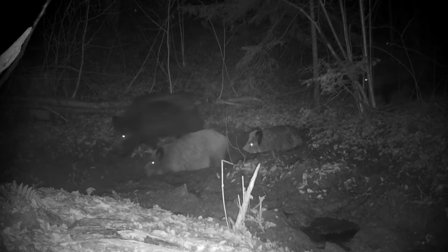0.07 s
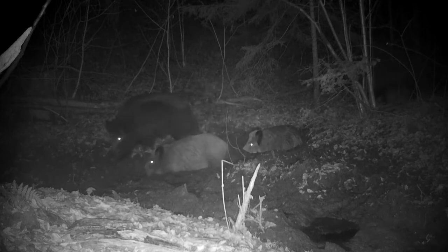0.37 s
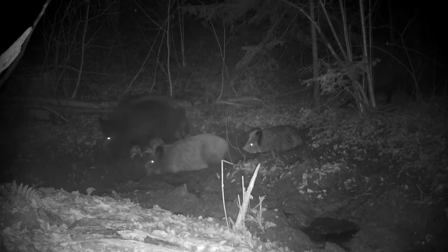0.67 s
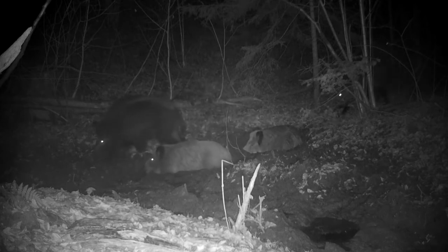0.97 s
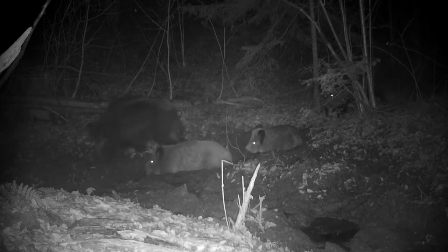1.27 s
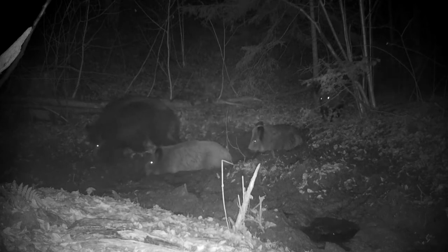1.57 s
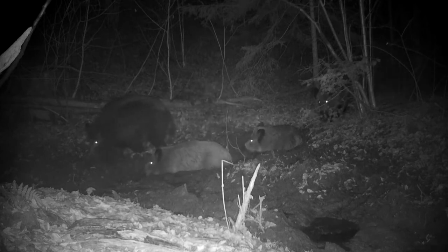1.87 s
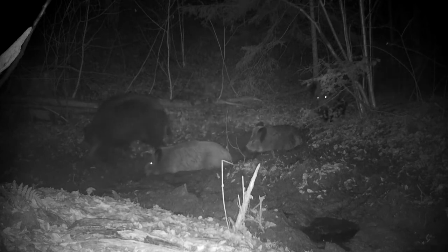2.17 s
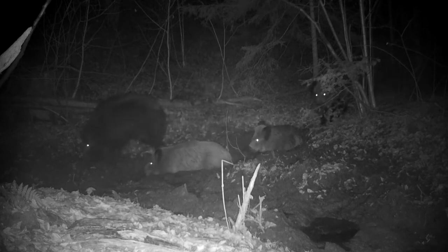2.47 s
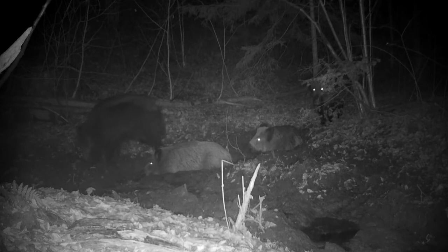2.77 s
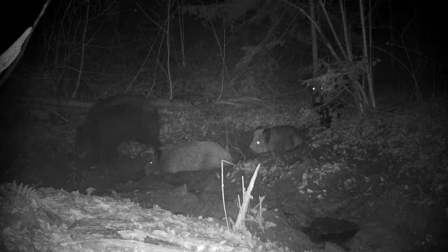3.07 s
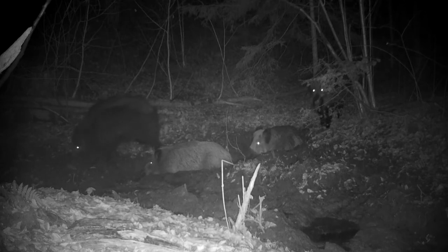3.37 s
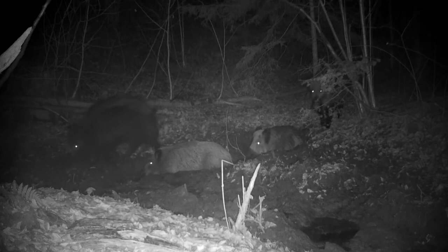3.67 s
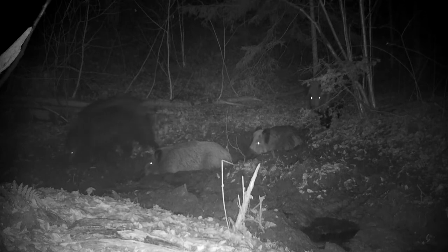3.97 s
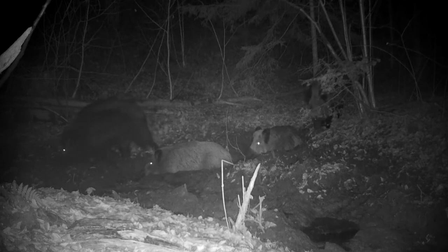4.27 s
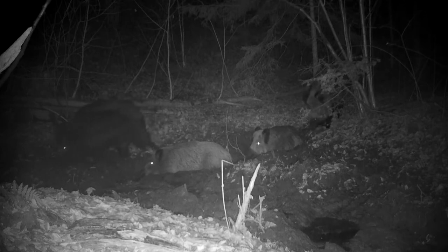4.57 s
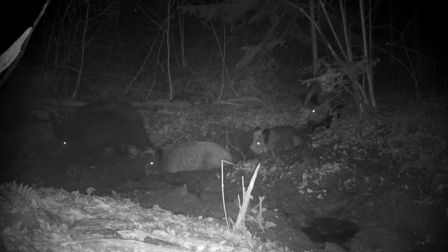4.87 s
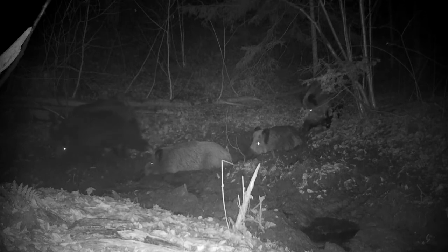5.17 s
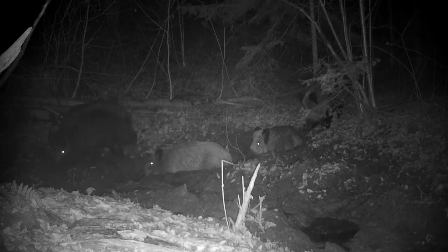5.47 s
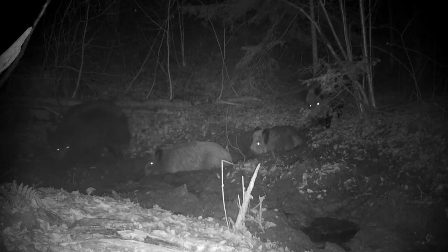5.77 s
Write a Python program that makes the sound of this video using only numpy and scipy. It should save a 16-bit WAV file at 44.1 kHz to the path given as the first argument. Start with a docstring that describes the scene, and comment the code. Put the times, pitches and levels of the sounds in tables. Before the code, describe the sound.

Wild boars root in mud some metres off, with small wet pops, squelches, ticking twigs and rustling leaves over a steady hiss.

```python
"""Mud squelches and pops, with two soft hoof thuds: wild boars root in a forest hollow at night.
Snouts and hooves open air pockets in the mud, which pop singly or squelch in bursts.
Twigs tick, wet leaves rustle, dead leaves crunch and, near the end, a branch snaps.
The herd is some metres off; the trees answer faintly, over a steady hiss."""
import sys
import numpy as np
from scipy import signal
from scipy.fft import rfft, irfft, next_fast_len
from scipy.io import wavfile
from scipy.ndimage import map_coordinates

SR = 44100
rng = np.random.default_rng(int(sys.argv[2]) if len(sys.argv) > 2 else 0)


def bounce(signal):
    """Save signal as a 16-bit WAV file at the path given by the first command-line argument."""
    frames = np.transpose(np.atleast_2d(signal))
    limited = np.clip(frames, -1, 1)
    pcm = np.round(limited * 32767).astype(np.int16)
    wavfile.write(sys.argv[1], SR, pcm)


N = 261072

# mud suction: (time [s], length [s], level [dB], low cavity [Hz], high cavity re low [dB])
SQUELCH_EVENTS = [(0.042, 0.027, -62, 580, 20), (0.329, 0.02, -55.5, 760, 13),
                  (0.4, 0.026, -59.5, 730, -17), (0.502, 0.024, -55, 480, 9),
                  (1.515, 0.094, -49.5, 800, -25), (1.558, 0.063, -54.5, 580, -12),
                  (1.846, 0.025, -68, 830, 0), (2.332, 0.017, -62.5, 790, 14),
                  (2.357, 0.021, -61.5, 607, -3), (2.733, 0.013, -66.5, 530, -7),
                  (2.807, 0.037, -58, 655, 11), (2.853, 0.016, -67.5, 605, -18),
                  (2.989, 0.013, -64.5, 600, 13), (3.055, 0.022, -55, 630, -3), (3.079, 0.017, -63, 520, 7),
                  (3.691, 0.075, -59, 520, -17), (4.061, 0.042, -57.5, 670, 3),
                  (4.512, 0.049, -58.5, 630, -6), (5.611, 0.094, -57.5, 695, 6)]
# wet splatter: (frequency [Hz], relative level [dB])
SPLATTER_SPECTRUM = [(50, -40), (150, -27), (300, -11.5), (500, 3.5), (1300, -3.5), (2400, -2),
                     (3500, -8.5), (5500, -14.5), (8000, -26), (15000, -66)]
# bright edge of a crack, with a faint fizz above 12 kHz: (frequency [Hz], relative level [dB])
CRACK_SPECTRUM = [(40, -55), (200, -25), (1500, 8), (4000, -8), (6000, 0.5), (8000, -5), (12000, -23),
                  (15300, -22)]
SPLINTER_RISE_S = 0.0015


def pops(attack_s=0.0015, glide=0.035, t60_1khz_s=0.029, splatter_t60_ratio=0.37, dull_hz=6500):
    """A pocket tears open: its air rings at two pitches, rising as it opens, and mud splatters."""
    # air pockets: (time [s], level [dB], low cavity [Hz], high cavity [Hz], high re low [dB],
    # splatter re stronger cavity [dB])
    pockets = [(0.3125, -24.5, 458, 1240, 1, 2), (0.3339, -19, 1410, 2300, 1, 6.5),
               (0.3477, -20, 1245, 2360, 1, -5.5), (0.3662, -27, 1240, 2280, -2, 1),
               (0.3975, -27, 687, 1220, -3, 2), (0.403, -27, 844, 2410, 12, -8),
               (0.4165, -28.5, 890, 2520, -3, -7), (0.437, -29, 656, 1450, -9, -9),
               (0.445, -32, 900, 2350, 1, -9), (0.4835, -25.5, 597, 803, 3, 6),
               (0.4951, -19, 812, 1247, -0.5, -2), (0.4965, -29, 507, 1446, 17, -9),
               (0.51, -25.5, 740, 1900, 2, -9), (1.1125, -33, 1350, 1710, 7, -2),
               (1.23, -37, 1920, 3030, -3, -2), (1.317, -33.5, 790, 1350, 8, 1),
               (1.518, -29, 598, 1390, -2, -13), (1.527, -22.5, 770, 1350, 1.5, -11),
               (1.5405, -34, 616, 1400, -6, -10), (1.578, -32, 650, 1290, 7, -6),
               (1.589, -36, 603, 1480, 10, -9), (1.816, -30.5, 765, 1980, 5, 10),
               (1.859, -37, 830, 1870, -3, -13), (2.157, -26.5, 780, 1350, -3.5, -1),
               (2.191, -29, 845, 1450, 1, -10), (2.228, -29.5, 1760, 2090, -16, -14),
               (2.329, -32, 810, 1496, 9, 1), (2.4935, -33.5, 786, 1530, -31, -17),
               (2.625, -30.5, 1880, 2500, -9, -2), (2.786, -33, 580, 2480, -3, -12),
               (2.823, -35.5, 900, 1590, 8, -5), (2.873, -36.5, 744, 1080, -16, -12),
               (3.061, -34, 704, 1526, -2, -3), (3.072, -29.5, 700, 1670, -1.5, -8),
               (3.937, -25.5, 1285, 1620, -6, -11), (3.945, -27, 560, 1604, -0.5, -8),
               (3.958, -34, 496, 1540, -22, -9), (4.014, -35.5, 664, 1140, -9, -13)]
    out, t = np.zeros(N), np.arange(SR // 8) / SR
    for s, db, low_hz, high_hz, high_db, splatter_db in pockets:
        stronger_khz = (high_hz if high_db > 0 else low_hz) / 1000
        t60_s = t60_1khz_s / stronger_khz ** 0.84  # smaller, higher pockets die sooner
        opening = np.minimum(3 * t / t60_s, 1)
        phase_per_hz = 2 * np.pi * np.cumsum(1 + glide * (opening - 0.5)) / SR
        air = np.sin(low_hz * phase_per_hz) + amp(high_db) * np.sin(high_hz * phase_per_hz)
        onset = 1 - np.exp(-t / attack_s)
        burst = onset * amp(-60 * t / (splatter_t60_ratio * t60_s))
        spray = muffled(rng.standard_normal(len(t)) * burst, dull_hz)
        splatter = coloured(spray, SPLATTER_SPECTRUM) * np.sqrt(np.mean(burst ** 2))
        pop = air * onset * amp(-60 * t / t60_s) + amp(splatter_db + max(high_db, 0)) * splatter
        add(out, s, amp(db) * pop / np.abs(pop).max())
    return out


def squelches(high_hz=1435, low_q=5.2, high_q=5, splatter_db=-7):
    """Mud sucks at a hoof or snout: a quick run of tiny ruptures rings the hollow around it."""
    out, t = np.zeros(N), np.arange(SR // 6) / SR
    for s, length_s, db, low_hz, high_db in SQUELCH_EVENTS:
        pull = press(t, length_s, attack_s=0.0016, release_s=0.015)
        ruptures = crackle(len(t), per_s=1800, spread_db=3)
        wet = coloured(ruptures * pull, SPLATTER_SPECTRUM)
        hollow = unit(resonant(wet, low_hz, low_q) + amp(high_db) * resonant(wet, high_hz, high_q))
        add(out, s, amp(db) * unit(hollow + amp(splatter_db) * wet) * np.sqrt(t[-1] / length_s))
    return out


def bubbles(centre_hz=1400, t60_cycles=22, count=40, gain_db=3):
    """Small bubbles burst at random and ring briefly, louder where the mud is churned."""
    out, t = np.zeros(N), np.arange(SR // 16) / SR
    mud_db = churn_db()
    for when, pitch in rng.random((count, 2)):
        hz = centre_hz * 2 ** (2 * pitch - 1)
        ring = np.sin(2 * np.pi * hz * t) * amp(-60 * hz * t / t60_cycles) * (1 - np.exp(-hz * t))
        add(out, when * N / SR, amp(mud_db[int(when * N)] + gain_db) * ring)
    return out


def ticks(break_db=14, bandwidth_hz=560, dull_hz=6000, mean_t60_s=0.022, edge_t60_s=0.033):
    """A twig or wet stalk gives way: one sharp break sets it ringing; splinters add a bright edge."""
    # breaking twigs: (time [s], level [dB], pitch [Hz], edge re ring [dB])
    twigs = [(0.638, -31, 3420, -16), (0.654, -35, 5000, -15), (1.179, -33.5, 2570, -13),
             (1.18, -42, 5030, -26), (1.297, -45, 4900, -23), (1.391, -37, 2670, -23),
             (1.392, -44, 5360, -24), (1.411, -40, 5670, -10), (1.442, -41, 5370, -20),
             (1.855, -31, 2430, -11), (2.1767, -30.5, 3170, -34), (2.228, -39, 5460, 5),
             (2.37, -30.5, 2780, -9), (2.422, -35, 1870, -19), (2.4477, -31.5, 2020, -10),
             (2.542, -32.5, 3130, -8), (2.613, -27, 2460, -22), (2.6143, -38, 3120, -22),
             (2.808, -33, 1590, -18), (3.008, -33, 3540, -8), (3.037, -41, 5500, -6),
             (3.059, -33, 3250, -7), (3.393, -38, 3600, -21), (3.507, -36, 3340, -6),
             (4.089, -33, 3100, -37), (4.316, -44, 5000, -14), (4.3393, -46, 5140, -20),
             (4.827, -37, 3570, -18), (4.9554, -44, 5040, -4), (5.0025, -33, 4970, -26),
             (5.091, -42, 3770, -23), (5.109, -33.5, 3530, -26), (5.116, -43, 4800, -25)]
    out, t = np.zeros(N), np.arange(SR // 12) / SR
    impulse = np.zeros(len(t))
    impulse[SR // 1000] = amp(break_db)
    mean_db = np.mean([db for _, db, *_ in twigs])
    for s, db, hz, edge_db in twigs:
        t60_s = mean_t60_s * 2 ** ((db - mean_db) / 42)  # thicker, louder stalks ring longer
        splinters = puff(t, SPLINTER_RISE_S, t60_s)
        ring = muffled(resonant(splinters + impulse, hz, hz / bandwidth_hz), dull_hz)
        edge = coloured(puff(t, SPLINTER_RISE_S, edge_t60_s), CRACK_SPECTRUM)
        tick = ring + amp(edge_db) * edge
        add(out, s, amp(db) * tick / np.abs(tick).max())
    return out


def branch(fibres_db=-10, edge_db=-13, edge_t60_s=0.036, attack_s=0.00051, bark_db=-8):
    """A damp branch breaks under a hoof: each crack tears fibres that ring the wood, and bursts bark."""
    # cracks: (time [s], level of first 10 ms [dB], tearing t60 [s])
    snaps = [(4.5255, -48, 0.04), (4.531, -41, 0.03), (4.5735, -32, 0.089), (4.5785, -36, 0.034),
             (4.5855, -43, 0.026)]
    # wood resonances: (frequency [Hz], relative level [dB], t60 [s])
    modes = [(484, -7.5, 0.068), (683, -1.5, 0.06), (1180, -5, 0.019), (1330, 1.5, 0.02),
             (1910, 0.5, 0.018), (2660, -4, 0.038), (3120, -2.5, 0.018), (3380, 1.5, 0.012),
             (4510, -8, 0.018), (5720, -4.5, 0.0085)]
    out, t = np.zeros(N), np.arange(SR // 10) / SR
    for s, db, tear_s in snaps:
        fibres = crackle(len(t), per_s=880, spread_db=1) * amp(fibres_db - 60 * t / tear_s)
        fibres[0] = 1  # initial break
        ring = sum(amp(mode_db - 60 * t / t60_s) * np.sin(2 * np.pi * (hz * t + rng.random()))
                   for hz, mode_db, t60_s in modes)
        wood = unit(signal.fftconvolve(fibres, ring * (1 - np.exp(-t / attack_s)))[:len(t)])
        bark = coloured(puff(t, SPLINTER_RISE_S, tear_s), SPLATTER_SPECTRUM)
        edge = coloured(puff(t, attack_s, edge_t60_s), CRACK_SPECTRUM)
        snap = wood + amp(bark_db) * bark + amp(edge_db) * edge
        add(out, s, amp(db) * snap / snap[:SR // 100].std())
    return out


def crunches():
    """A hoof presses down on dead leaves, which break in a ragged cluster."""
    # steps on leaf litter: (time [s], length [s], level [dB], pitch [Hz])
    steps = [(0.02, 0.09, -68, 4700), (0.12, 0.032, -58, 1930), (0.64, 0.044, -56.5, 1900),
             (0.747, 0.038, -57.5, 1780), (1.057, 0.024, -66, 2250), (1.33, 0.015, -65.5, 2460),
             (1.388, 0.12, -61, 5000), (1.846, 0.039, -57, 2720), (1.93, 0.096, -62, 4800),
             (2.029, 0.048, -60, 3920), (2.524, 0.072, -55, 3030), (2.588, 0.078, -56.5, 3080),
             (2.968, 0.055, -55, 2080), (3.304, 0.064, -53, 1600), (3.342, 0.11, -63, 5000),
             (3.498, 0.03, -64, 3180), (3.689, 0.05, -58, 3460), (4.518, 0.041, -64, 4640),
             (4.716, 0.064, -60.5, 4600), (5.088, 0.03, -68, 3480), (5.877, 0.055, -63, 2760)]
    out, t = np.zeros(N), np.arange(SR // 8) / SR
    for s, length_s, db, hz in steps:
        breaks = crackle(len(t), per_s=1100, spread_db=4)
        load = press(t, length_s, attack_s=0.001, release_s=0.03)
        crunch = woody(breaks * load, hz, q=1.74, edge_db=-15)
        add(out, s, amp(db) * unit(crunch) * np.sqrt(t[-1] / length_s))
    return out


def thuds(ground_hz=165, t60_s=0.03, attack_s=0.0032, gain_db=6):
    """Soft ground takes a hoof with one low, quickly damped push."""
    # heavy hoof falls: (time [s], level before gain [dB])
    hoof_falls = [(0.313, -38), (0.331, -45)]
    out, t = np.zeros(N), np.arange(SR // 8) / SR
    for s, db in hoof_falls:
        envelope = amp(db + gain_db - 60 * t / t60_s) * (1 - np.exp(-t / attack_s)) ** 2
        add(out, s, envelope * np.sin(2 * np.pi * ground_hz * t))
    return out


def stalks(centre_hz=4200, spread_oct=0.68, t60_s=0.022, gain_db=1, count=28):
    """Thin stalks and leaves give way at random, with faint high ticks."""
    out, t = np.zeros(N), np.arange(SR // 24) / SR
    busy_db = activity_db()
    for when, pitch, softness in rng.random((count, 3)):
        hz = centre_hz * 2 ** (spread_oct * (2 * pitch - 1))
        tick = woody(puff(t, SPLINTER_RISE_S, t60_s), hz, q=5.3, edge_db=-8)
        db = busy_db[int(when * N)] + gain_db - 10 * softness
        add(out, when * N / SR, amp(db) * tick / np.abs(tick).max())
    return out


def woody(excitation, hz, q, edge_db, dull_hz=5500):
    """Dry plant matter breaking: a damped ring, softened by distance, and a bright edge."""
    ring = muffled(resonant(excitation, hz, q), dull_hz)
    return ring + amp(edge_db) * coloured(excitation, CRACK_SPECTRUM)


def rooting():
    """The herd keeps shifting mud, wet leaves and dry litter; thin wet films prickle as they tear."""
    # contact spectrum of each material: (frequency [Hz], relative level [dB])
    mud_spectrum = [(60, -43), (150, -30.5), (330, -23), (500, -11), (750, -7.5), (1100, -9.5), (2000, -11),
                    (5000, -61)]
    leaf_spectrum = [(400, -22.5), (900, -10.5), (1400, -0.5), (2300, -2), (3400, -8.5), (4500, -22.5),
                     (8000, -47.5)]
    litter_spectrum = [(1500, -26), (3300, 8), (5200, 5), (7000, -7.5), (9000, -27), (13000, -34),
                       (15300, -16)]
    film_spectrum = [(1500, -18), (3200, 3.5), (5300, -2.5), (7000, -20), (9500, -37)]
    busy_db = activity_db()
    wide_swing_db = busy_db.mean() + 1.34 * (busy_db - busy_db.mean())
    mud = stirred(churn_db(), mud_spectrum, per_s=4000, clump_db=1.26)
    leaves = stirred(busy_db - 3, leaf_spectrum, per_s=3500, clump_db=1.5)
    litter = stirred(wide_swing_db - 23, litter_spectrum, per_s=2200, clump_db=6)
    prickles = stirred(wide_swing_db - 26, film_spectrum, per_s=130, clump_db=6)
    return mud + leaves + litter + prickles


def stirred(level_db, spectrum, per_s, clump_db):
    """Many small contacts, coming in clumps."""
    contacts = crackle(N, per_s, spread_db=3.5)
    clumps = amp(clump_db * wobble(knots_per_s=45))
    return amp(level_db) * coloured(contacts * clumps, spectrum)


def activity_db():
    """How busily the ground is stirred, per sample."""
    # herd activity: (time [s], level [dB])
    activity = [(0.0, -45.5), (0.49, -47), (0.89, -48.5), (1.15, -50.5), (1.45, -46.5), (1.81, -48.5),
                (2.06, -48), (3.61, -49), (3.97, -46.5), (4.17, -49), (5.24, -51), (5.92, -49)]
    return np.interp(np.arange(N) / SR, *np.transpose(activity))


def churn_db(mud_db=-4.5, swell_db=3, reach_s=0.027):
    """Level of the shifting mud: follows the activity and swells around each squelch."""
    t = np.arange(N) / SR
    swell_power = sum(amp(db + swell_db) ** 2 * np.exp(-np.abs(t - s) / reach_s)
                      for s, _, db, *_ in SQUELCH_EVENTS)
    return 10 * np.log10(amp(activity_db() + mud_db) ** 2 + swell_power)


def recorder_tone(x):
    """Microphone tone: less deep bass, dipped treble, a faint lift near 15 kHz."""
    # microphone response: (frequency [Hz], gain [dB])
    mic_gain = [(50, -13), (150, -2.5), (2500, -1), (6500, -7.5), (9000, -12.5), (13000, -10), (15300, 5)]
    return filtered(x, lambda hz: amp(along(mic_gain, hz)))


def forest(x, delay_s=0.014):
    """Trunks scatter a thin tail, longest in the bass."""
    # decay among the trees: (frequency [Hz], t60 [s])
    decay = [(200, 0.26), (1500, 0.16), (8000, 0.14)]
    hz, t, noise = signal.stft(rng.standard_normal(SR // 2), SR, nperseg=256)
    tail = signal.istft(noise * amp(-60 * t / along(decay, hz)[:, None]), SR, nperseg=256)[1]
    response = np.pad(tail / np.linalg.norm(tail), (int(delay_s * SR), 0))
    return signal.fftconvolve(x, response)[:N]


def hiss(level_db=-54.5):
    """Steady noise, strongest in the midrange."""
    # background noise: (frequency [Hz], relative level [dB])
    spectrum = [(15, -56), (25, -49), (69, -21.5), (104, -16.5), (215, -9.5), (260, -7.5), (410, -4),
                (482, -5), (537, -3.5), (722, -4.5), (1300, -2.5), (2850, -10.5), (5010, -21), (6210, -30),
                (10400, -45), (11000, -40.5), (11700, -46.5), (15500, -48)]
    return amp(level_db) * coloured(rng.standard_normal(N), spectrum)


def crackle(size, per_s, spread_db):
    """Impulses at random moments, of uneven strength."""
    hits = (rng.random(size) < per_s / SR) * rng.choice([-1, 1], size)
    return hits * amp(spread_db * rng.standard_normal(size).clip(-2, 2))


def puff(t, rise_s, t60_s):
    """Noise that builds quickly and dies away."""
    return rng.standard_normal(len(t)) * (1 - np.exp(-t / rise_s)) * amp(-60 * t / t60_s)


def press(t, length_s, attack_s, release_s):
    """A push that builds, holds and lets go."""
    return (1 - np.exp(-t / attack_s)) * (1 - np.tanh((t - length_s) / release_s))


def wobble(knots_per_s):
    """Smooth random curve."""
    knots = rng.standard_normal(int(N * knots_per_s / SR) + 4)
    return map_coordinates(knots, [np.arange(N) * knots_per_s / SR])


def filtered(x, response):
    """x times a frequency response."""
    size = next_fast_len(len(x) + 4096)
    return irfft(rfft(x, size) * response(np.fft.rfftfreq(size, 1 / SR)), size)[:len(x)]


def coloured(x, spectrum):
    """x shaped by a spectrum, at rms 1."""
    return unit(filtered(x, lambda hz: amp(along(spectrum, hz))))


def resonant(x, hz, q):
    """x through one resonance, at rms 1."""
    return unit(filtered(x, lambda f: 1j * f * hz / q / (hz * hz - f * f + 1j * f * hz / q)))


def muffled(x, dull_hz):
    """Low-pass: treble softened by distance."""
    return filtered(x, lambda hz: 1 / (1 + (hz / dull_hz) ** 4))


def along(points, hz):
    """(frequency [Hz], value) points read on a log axis."""
    points_hz, values = np.transpose(points)
    return np.interp(np.log(hz + 1), np.log(points_hz), values)


def amp(db):
    """Decibels to gain."""
    return 10 ** (np.asarray(db) / 20)


def unit(x):
    """x at rms 1."""
    return x / np.sqrt(np.mean(x ** 2) + 1e-20)


def add(track, s, sound):
    """Mix a sound in at time s."""
    part = track[max(round(s * SR), 0):][:len(sound)]
    part += sound[:len(part)]


def scene():
    """Boars among the trees, over the hiss; mono."""
    boars = pops() + squelches() + bubbles() + crunches() + branch() + ticks() + stalks() + thuds()
    boars = recorder_tone(boars)
    return (boars + hiss() + amp(-13) * forest(boars) + rooting())[None]


def record(dry):
    """Band limit at 15.6 kHz."""
    return filtered(dry[0], lambda hz: hz < 15600)[None]


dry = scene()
out = record(dry)
bounce(out)
```